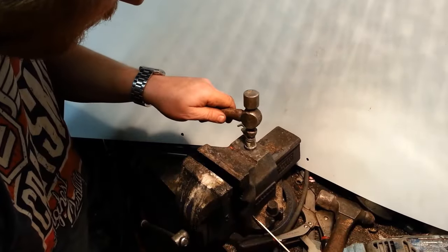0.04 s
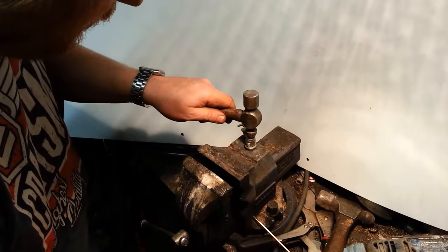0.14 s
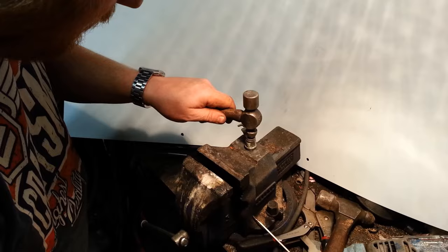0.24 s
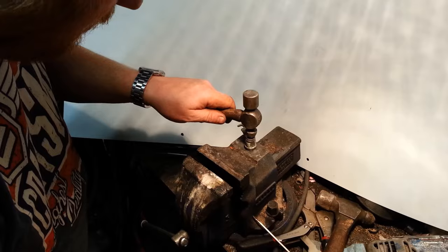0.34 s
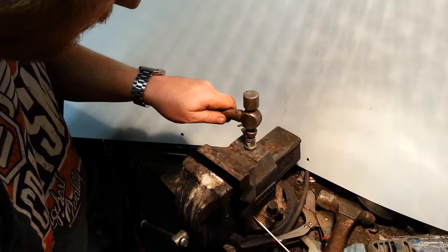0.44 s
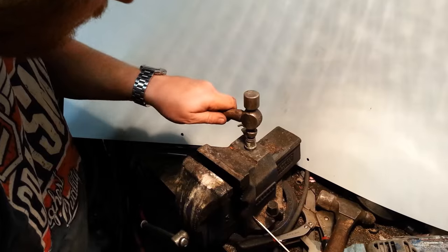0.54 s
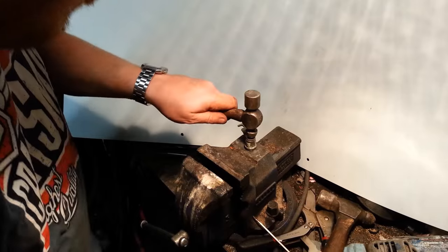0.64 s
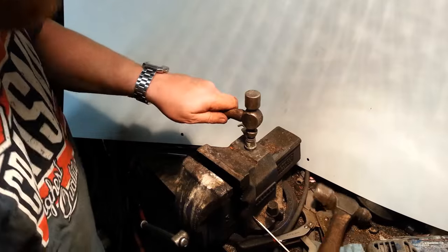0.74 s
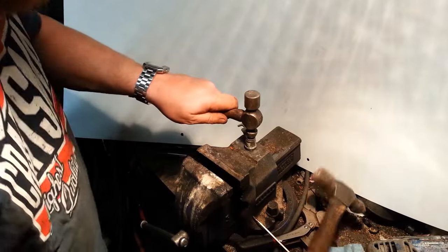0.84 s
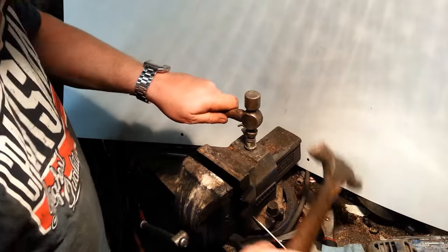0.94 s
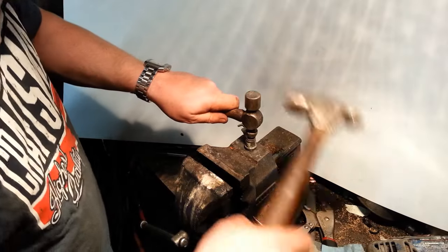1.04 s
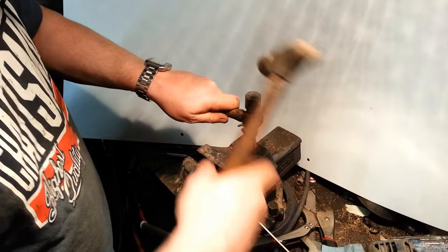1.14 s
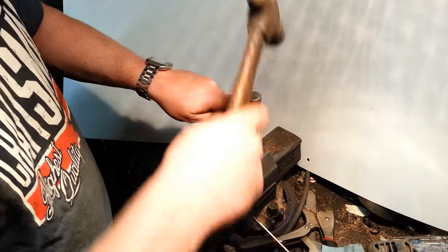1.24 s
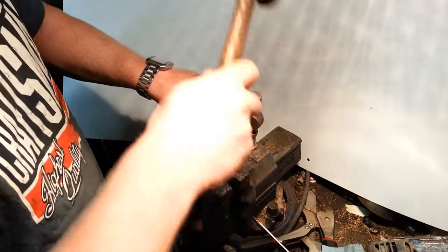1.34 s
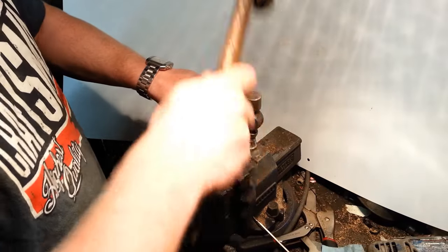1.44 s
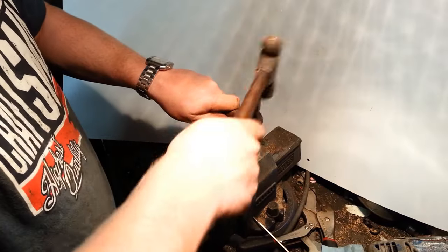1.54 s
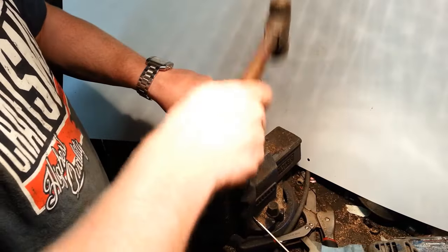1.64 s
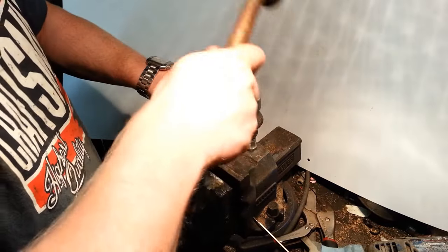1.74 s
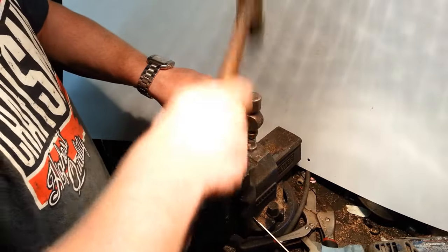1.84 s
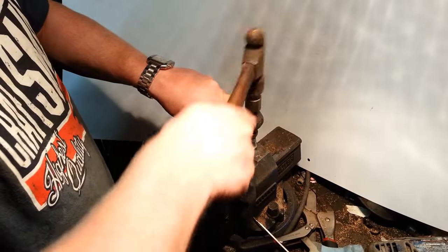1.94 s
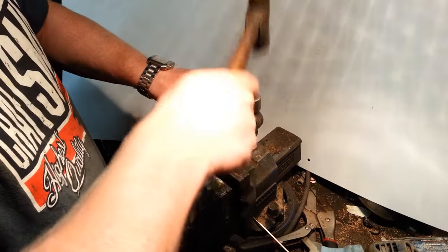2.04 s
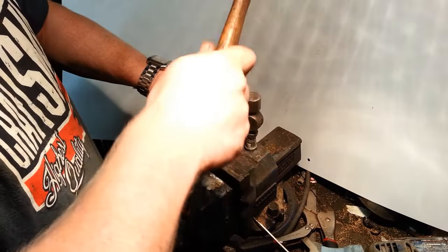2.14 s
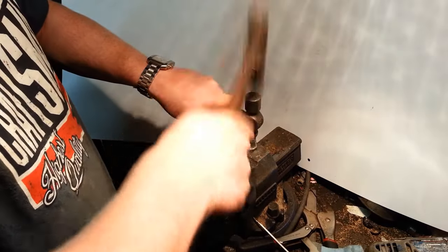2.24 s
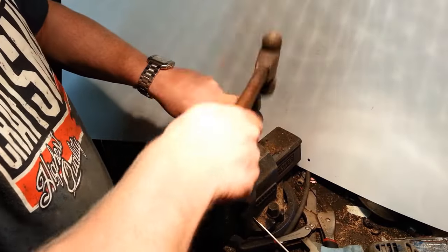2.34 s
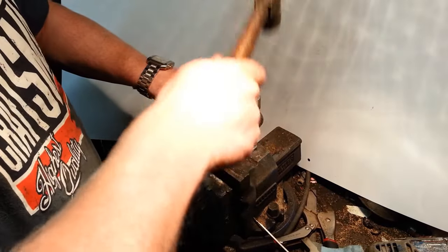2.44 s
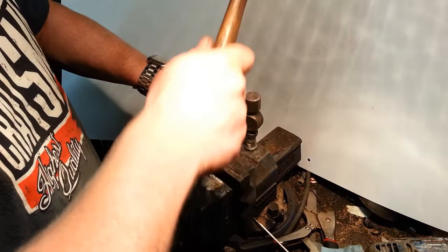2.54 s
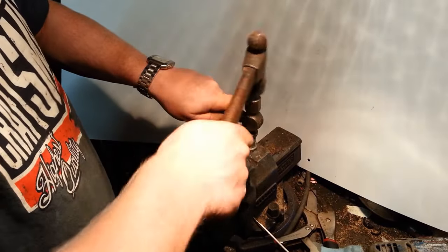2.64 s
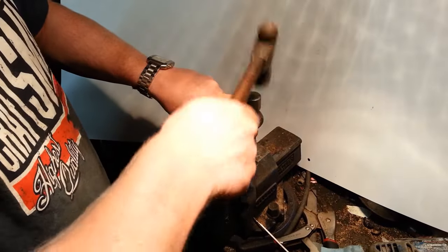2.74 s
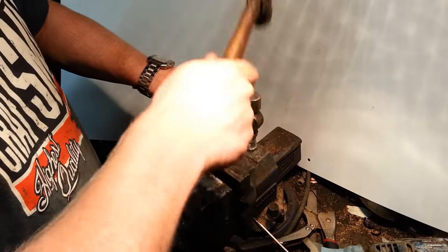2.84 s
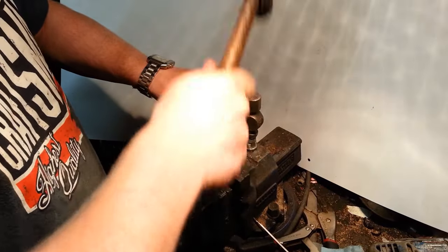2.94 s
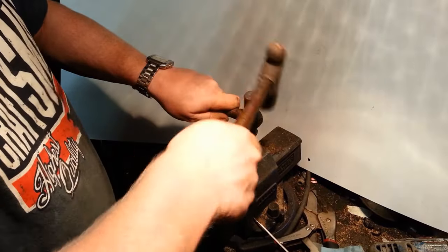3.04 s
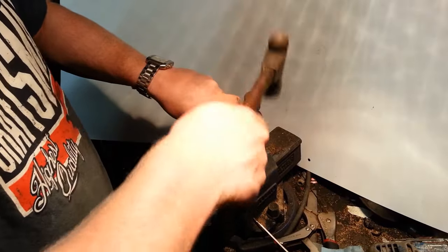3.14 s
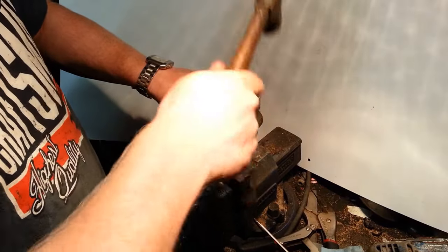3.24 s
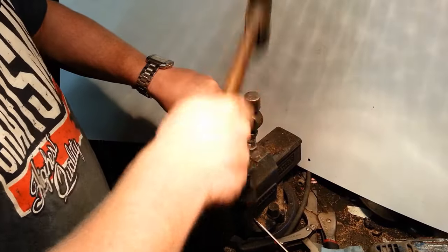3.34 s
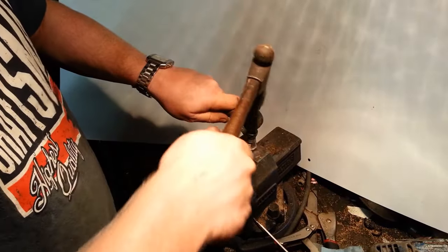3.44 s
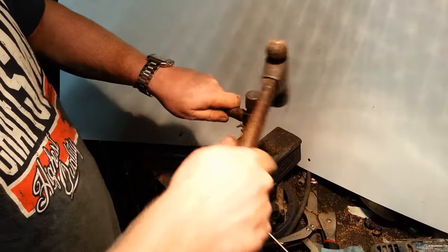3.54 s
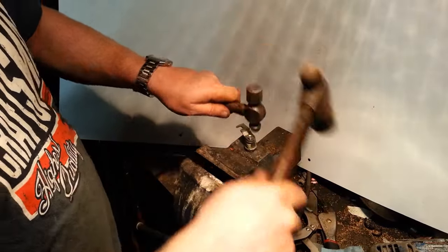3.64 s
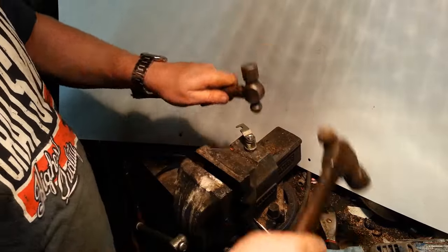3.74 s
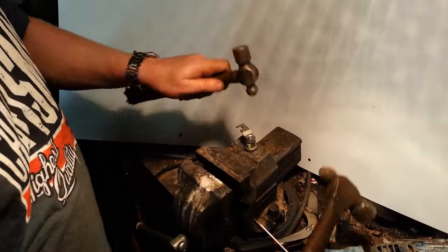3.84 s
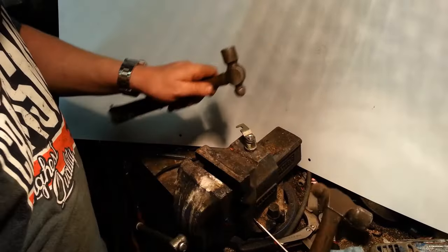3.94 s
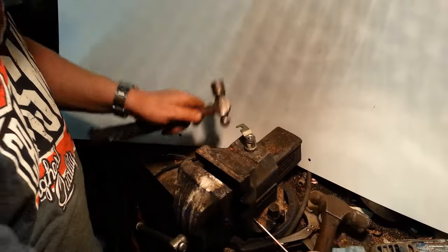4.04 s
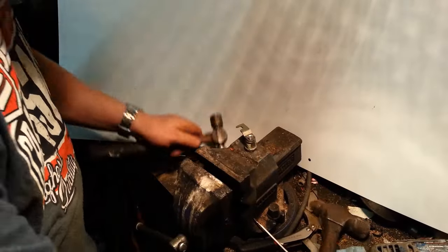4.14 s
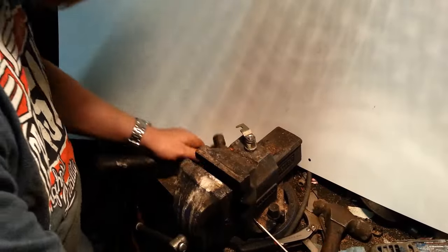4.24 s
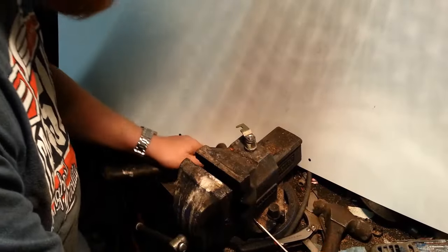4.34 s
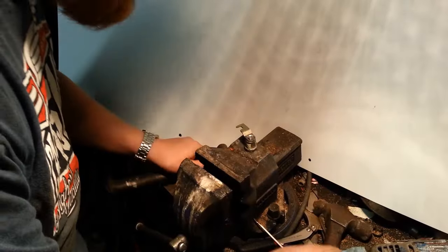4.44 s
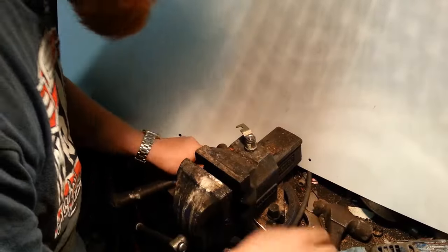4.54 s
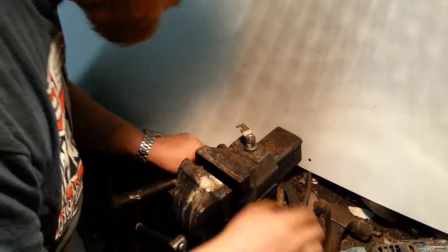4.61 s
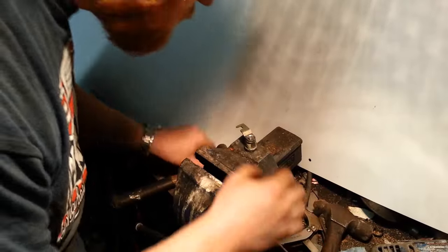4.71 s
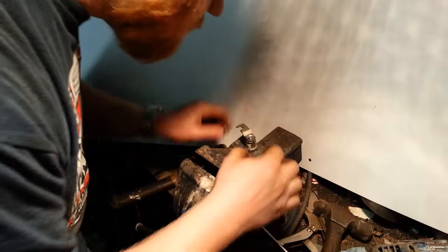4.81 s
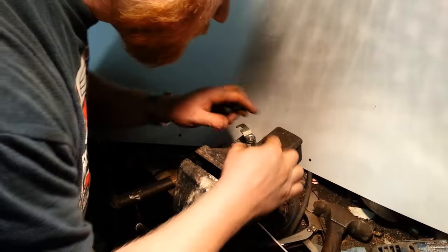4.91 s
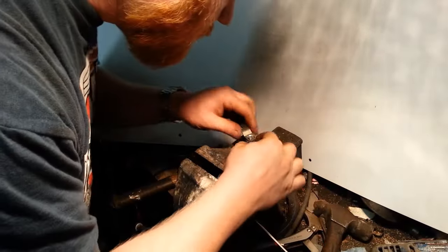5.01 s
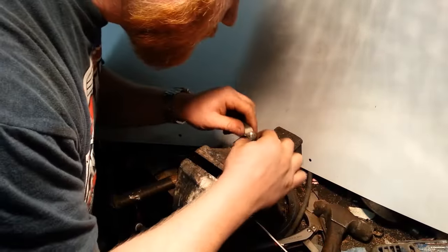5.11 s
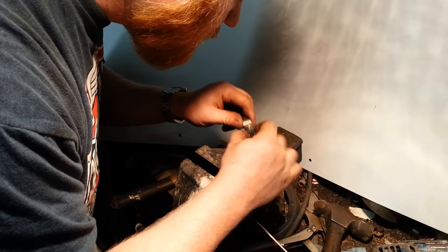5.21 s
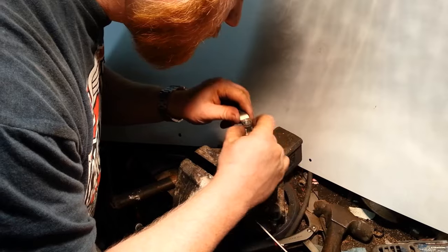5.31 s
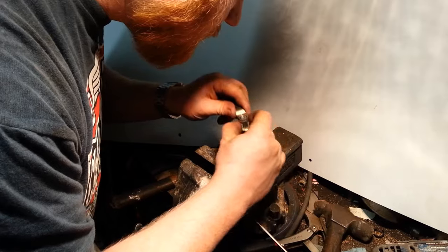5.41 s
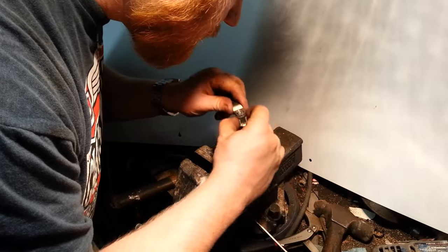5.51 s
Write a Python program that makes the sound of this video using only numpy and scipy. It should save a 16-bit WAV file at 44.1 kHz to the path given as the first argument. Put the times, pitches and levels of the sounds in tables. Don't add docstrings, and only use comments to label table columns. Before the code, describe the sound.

A small workshop heard from close by, over faint low hum and input hiss. At about 0.6-0.75 s, tiny ticks and soft wooden handle knocks; around 1.1-1.3 s, brief grainy rubs of cloth and skin, then a faint arm swing. Six steel-on-steel hammer blows follow at about 1.6, 2.0, 2.35, 2.7, 3.1 and 3.45 s: the first slightly lighter, the fourth most ringing, the fifth with the loudest crack. Each is a bright hard crack with short vise ring and heavy bench boom, clipping the microphone harshly; small rebounds, wooden knocks, jingling loose parts and a short dense room tail fill the gaps. Faint jingles and rustle at 3.7-4.0 s as the blows die away. At 4.25 s a hammer clanks onto the bench with a dull wooden thud, bounces, and another slaps flat at 4.4 s. Faint settling taps at 4.65 s, slight rustle, then quiet hum and hiss.

```python
import sys
import numpy as np
from scipy import signal
from scipy.fft import rfft, irfft
from scipy.io import wavfile
from scipy.ndimage import uniform_filter1d, minimum_filter1d

SR = 44100
rng = np.random.default_rng(int(sys.argv[2]) if len(sys.argv) > 2 else 0)


def voltage_ratio(decibels):
    exponent = np.asarray(decibels, float) / 20
    return 10 ** exponent


def generate_wav(sig):
    pcm = np.round(np.clip(np.atleast_2d(sig).T, -1, 1) * 32767).astype(np.int16)
    wavfile.write(sys.argv[1], SR, pcm)


N = 245681


def on_log(table, hz):
    table_hz, values = np.transpose(table)
    return np.interp(np.log(np.maximum(hz, 1)), np.log(table_hz), values)


def noise(colour, size):
    hz = np.arange(size // 2 + 1) * SR / size
    x = irfft(rfft(rng.standard_normal(size)) * voltage_ratio(on_log(colour, hz)), size)
    return x / np.std(x)


def burst(colour, fade, stretch, size=16384):
    t = np.arange(size) / SR
    spectrum = rfft(noise(colour, size))
    octave = np.log2(np.maximum(np.arange(size // 2 + 1) * SR / size, 1))
    out = np.zeros(size)
    for centre in np.arange(5, 14.5, 0.5):
        hz = 2 ** centre
        band = irfft(spectrum * np.clip(1 - 2 * abs(octave - centre), 0, 1), size)
        decay = voltage_ratio(-60 * t / (stretch * on_log(fade, hz)))
        out += band * decay * (1 - np.exp(-t * hz / 0.74))
    return out


def ring(modes, scatter_db, rough, size=16384):
    hz, db, t60 = np.transpose(modes)[:, :, None]
    t = np.arange(size) / SR
    level_luck, pitch_luck = rng.standard_normal((2, len(modes), 1))
    steps = np.repeat(rng.standard_normal((2, len(modes), size // 128)), 128, axis=2)
    phase_waver, level_waver = uniform_filter1d(steps, 256, axis=2)
    phase = 2 * np.pi * hz * (1 + 0.0028 * pitch_luck) * t + rough * np.sqrt(hz / 2000) * phase_waver
    level = voltage_ratio(db + scatter_db * level_luck - 60 * t / t60) * (1 + 0.5 * level_waver)
    return np.sum(level * np.sin(phase), axis=0)


def add(track, s, sound):
    i = int(s * SR)
    track[i:i + len(sound)] += sound[:N - i]


# frequency in Hz, level in dB per Hz.
BENCH_COLOUR = [(30, -44), (60, -21), (130, -10.5), (190, -21.5), (260, 8), (600, 6.5), (900, 5.5),
                (1500, -7.5), (3000, -33.5)]
# frequency in Hz, t60 in seconds.
STEEL_FADE = [(60, 0.39), (260, 0.13), (700, 0.097), (1840, .17), (4850, 0.16), (9000, 0.13), (12500, .12),
              (14000, 0.12)]


def steel(events, colour, modes, rough):
    out = np.zeros(N)
    for s, crack_db, bench_db, ring_db, stretch in events:
        add(out, s, voltage_ratio(crack_db) * burst(colour, STEEL_FADE, stretch))
        add(out, s, voltage_ratio(bench_db) * burst(BENCH_COLOUR, STEEL_FADE, stretch))
        add(out, s, voltage_ratio(ring_db) * ring(modes, scatter_db=1.5, rough=rough))
    return out


# start in seconds, crack in dB, ring of the vise in dB, song of the loose tools in dB,
# fade factor.
BLOWS = [
    (1.615, -2.5, -12, -53.5, 1.16),
    (1.969, 0, -5, -38.5, 1.15),
    (2.3426, 1, -3, -37.5, 1.1),
    (2.7162, 1.7, 1, -28, 1.246),
    (3.0921, 4, -4.5, -29.5, 1.055),
    (3.464, 3, -0.5, -29, 1.18),
]
# start in seconds, crack in dB, fade factor.
REBOUNDS = [
    (2.391, -12, 0.49),
    (2.785, -24.5, 1.6),
    (3.518, -16.5, .45),
]
# frequency in Hz, level in dB per Hz.
CRACK_COLOUR = [(530, -23.5), (900, 1.5), (1600, 4), (2100, 2.5), (2900, 2.5), (4100, 6), (5000, 5.5),
                (5800, -3.5), (7200, -5), (8500, 3.5), (9400, -6), (11900, -6.5), (13200, -12),
                (15400, -27.5)]
# frequency in Hz, level in dB, t60 in seconds.
VISE_MODES = [(272.8, -9, 0.21), (313, -15, .13), (324.6, -14, 0.074), (516.5, -17.5, 0.29),
              (575, -2, 0.11), (654, -8, 0.19), (846.4, -6.5, 0.16), (1152, -11.5, .2), (1412, -13.5, 0.17),
              (1850, -13.5, 0.11), (2200, -16, .1), (3670, -10, 0.15), (3800, -10.5, 0.14),
              (3997, -10.5, 0.25), (3730, -8, 0.12), (4920, -10.5, 0.062), (4600, -11, 0.18),
              (5210, -12, 0.085), (5860, -17.5, 0.13), (7900, -16.5, 0.12), (8400, -19, 0.13),
              (8500, -11, 0.18), (8750, -22, .11), (10900, -23, 0.15), (12000, -15, 0.11)]


def hammer_blows():
    strikes = []
    for s, db, ring_db, _, fade in BLOWS:
        strikes.append((s, db, db - 2.5, ring_db, fade))
    for s, db, fade in REBOUNDS:
        strikes.append((s, db, db + 3.2, db - 12.5, fade))
    return steel(strikes, CRACK_COLOUR, VISE_MODES, rough=0.85)


# start in seconds, clank in dB, bench in dB, long ring in dB, fade factor.
DROPS = [
    (4.1293, -44, -59.5, -61.5, .9),
    (4.2435, 0, -4.5, -7, 0.58),
    (4.3474, -26, -31, -54, 0.27),
]
# frequency in Hz, level in dB per Hz.
CLANK_COLOUR = [(530, -37.5), (900, -3), (1730, -9.5), (4080, -0.5), (4540, -5.5), (4930, -4),
                (6330, -15.5), (14400, -23.5), (15400, -47)]
# start in seconds, slap in dB, bench in dB, long ring in dB,
# fade factor.
SLAPS = [
    (4.4103, -6, -49, -33, 0.58),
    (4.660, -36.5, -62, -57, 1),
]
# frequency in Hz, level in dB per Hz.
SLAP_COLOUR = [(210, -42), (350, -11.5), (656, 8), (1350, -6.5), (2660, -5.5), (2970, -13.5), (3760, -5.5),
               (5200, -9.5), (5900, -25.5), (9360, -42), (10800, -49), (12200, -29), (15000, -93)]
# frequency in Hz, level in dB, t60 in seconds.
HEAD_MODES = [(3380, -4.5, 0.12), (3700, -15.5, 0.062), (4500, -9, .1), (5140, -14.5, .08),
              (5960, -18, 0.081), (8250, -13, .12), (9100, -14.5, 0.094), (10200, -22.5, 0.136),
              (11200, -21.5, .14), (11710, -26, 0.13), (14200, -19, .1)]


def dropped_hammers():
    clanks = steel(DROPS, CLANK_COLOUR, HEAD_MODES, rough=0.9)
    return clanks + steel(SLAPS, SLAP_COLOUR, HEAD_MODES, rough=0.97)


# frequency in Hz, level in dB, t60 in seconds.
TOOL_MODES = [(1200, 1.5, 0.54), (1235, -5, .4), (1296, -8, .5), (1355, -1.5, 0.8), (1362, -5, 0.65),
              (1630, -7, 0.45), (2255, -5, .5), (2330, -7, .45)]
# time of the blow in seconds, level in dB, pitch in Hz,
# t60 in seconds.
FAVOURED_MODES = [(1.615, -1, 2200, 0.043), (1.615, -5.5, 295, .08), (1.615, -4.5, 555, 0.083),
                  (1.615, -32.5, 1533, 0.43), (1.97, -6.5, 670, .08), (2.343, -4, 565, 0.089),
                  (2.717, -10.5, 1918, 0.19), (3.093, -6, 4940, 0.084), (3.093, -1.5, 630, .08)]
# frequency in Hz, level in dB, t60 in seconds.
FLAT_MODES = [(627, -7.5, 0.023), (950, -10.5, 0.019), (1206, -8, .03), (2500, -19, .03), (1440, -42, 0.33)]


def singing_bars():
    out = np.zeros(N)
    strikes = np.array(BLOWS)[:, 0]
    for s, _, _, song_db, _ in BLOWS:
        add(out, s, voltage_ratio(song_db) * ring(TOOL_MODES, scatter_db=3, rough=0.6, size=32768))
    for s, db, hz, t60 in FAVOURED_MODES:
        nearest_blow = strikes[np.argmin(abs(strikes - s))]
        add(out, nearest_blow, voltage_ratio(db) * ring([(hz, 0, t60)], scatter_db=1, rough=0.25, size=32768))
    add(out, SLAPS[0][0], ring(FLAT_MODES, scatter_db=1.5, rough=0.9))
    return signal.sosfilt(signal.butter(2, 200, "high", fs=SR, output="sos"), out)


# start in seconds, tone in dB, pitch in Hz, t60 in seconds,
# top of the thud in Hz.
KNOCKS = [(0.6567, -20, 375, 0.014, 1600), (0.7422, -24.5, 315, 0.034, 1700),
          (2.394, -6.5, 493, 0.026, 1000), (3.2808, -10.5, 516, 0.021, 1000), (3.517, -3, 563.6, .04, 2200),
          (4.246, -10, 225, 0.047, 500), (4.271, -3, 389, 0.032, 1100), (4.3477, -23.5, 382, 0.062, 1200),
          (4.6573, -22, 432, 0.056, 2000)]
# start in seconds, tone in dB, pitch in Hz, t60 in seconds.
SETTLES = [(.668, -29.5, 456, 0.04), (0.721, -36, 497, 0.06), (0.733, -37, 330, 0.053),
           (.757, -44, 427, .03), (3.284, -36, 1890, .03), (3.288, -24, 628, .03), (3.300, -24, 328, .04),
           (3.8263, -41.5, 905, 0.057), (4.679, -33.5, 224, 0.16), (4.69, -38, 300, .12)]


def handle_knocks():
    out, t = np.zeros(N), np.arange(8192) / SR
    touches = [(*row, -9.5) for row in KNOCKS]
    touches += [(*row, 800, -8) for row in SETTLES]
    for s, db, hz, t60, top_hz, thud_db in touches:
        tone = (1 - np.exp(-t / 0.00033)) * voltage_ratio(-60 * t / t60) * np.sin(2 * np.pi * hz * t)
        colour = [(80, -25), (220, 0), (top_hz, -4), (1.5 * top_hz, -20), (8 * top_hz, -50)]
        fade = [(100, 3.7 * t60), (1500, 2.3 * t60)]
        thud = burst(colour, fade, 0.97, size=8192) * (1 - np.exp(-t / 0.0011))
        add(out, s, voltage_ratio(db) * (tone + voltage_ratio(thud_db) * thud))
    return signal.sosfilt(signal.butter(2, 130, "high", fs=SR, output="sos"), out)


# start in seconds, level in dB, centre in Hz, width in Hz.
TICKS = [(0.5663, -33.5, 9500, 9000), (.5668, -39, 2750, 1500), (.6964, -39, 9000, 7000),
         (0.7408, -38, 2800, 2000), (1.056, -44, 8560, 3000), (1.4767, -33.5, 12900, 2990),
         (3.279, -45, 2500, 3000), (4.1298, -23, 3800, 3500), (4.1282, -35, 9500, 9000),
         (4.3475, -34, 4535, 4500), (1.6164, -1, 11700, 6000)]


def ticks():
    out, t = np.zeros(N), np.arange(441) / SR
    for s, db, hz, width_hz in TICKS:
        edges = np.clip([hz - width_hz / 2, hz + width_hz / 2], 200, 0.45 * SR)
        resonance = signal.butter(2, edges, "band", fs=SR, output="sos")
        click = signal.sosfilt(resonance, rng.standard_normal(len(t)) * np.exp(-t / 0.0031))
        add(out, s, voltage_ratio(db) * click / np.max(abs(click)))
    return out


# start in seconds, level in dB.
JINGLES = [(2.6712, -45), (2.9786, -41), (3.064, -40), (3.285, -40), (3.3595, -39), (3.4342, -42),
           (3.7354, -39.5), (3.8147, -37), (3.829, -39), (3.882, -46), (4.015, -50)]
# frequency in Hz, level in dB, t60 in seconds.
LOOSE_MODES = [(2310, 2, 0.091), (2922, -1, 0.031), (3500, -6, 0.05), (4220, -2.5, 0.066),
               (1130, -4.5, 0.055), (7000, -8, .03)]


def jingles():
    out = np.zeros(N)
    colour = [(900, -16), (2200, 1), (4500, -5), (9000, -21.5), (14000, -27.5)]
    for s, db in JINGLES:
        for lag_s, drop_db in ((0, -7), (0.007, -7), (0.016, -16)):
            scratch = voltage_ratio(1) * burst(colour, STEEL_FADE, 0.55, size=4096)
            chime = voltage_ratio(-2.5) * ring(LOOSE_MODES, scatter_db=3, rough=0.8, size=4096)
            add(out, s + lag_s, voltage_ratio(db + drop_db) * (scratch + chime))
    return out


# start in seconds, length in seconds, level in dB.
RUBS = [
    (1.095, .095, -51),
    (1.18, 0.063, -52.5),
    (1.225, .07, -48),
]
# start in seconds, length in seconds, level in dB.
SWINGS = [
    (1.33, 0.29, -59.5),
    (3.68, 0.54, -59.5),
    (4.72, 0.252, -61),
]


def rustle():
    out = np.zeros(N)
    for strokes, top_db in ((RUBS, -3), (SWINGS, -16)):
        colour = [(1800, -29), (2800, 4.5), (4500, -1), (6000, top_db), (13500, top_db), (15000, -24.5)]
        flicker_db = 1.8 * np.repeat(rng.standard_normal(N // 100 + 1), 100)[:N]
        grain = noise(colour, N) * voltage_ratio(flicker_db)
        swell = np.zeros(N)
        for s, length_s, db in strokes:
            add(swell, s, voltage_ratio(db) * np.hanning(int(length_s * SR)) ** 0.47)
        out += grain / np.std(grain) * swell
    return out


# frequency in Hz, t60 in seconds.
ROOM_T60 = [(100, 0.48), (500, 0.51), (2000, 0.41), (6000, 0.35), (14000, 0.031)]


def walls(near):
    colour = [(30, -11.5), (150, 1), (700, -6), (5000, -4), (15000, 14)]
    tail = burst(colour, ROOM_T60, 0.94, size=32768)
    tail = np.r_[np.zeros(int(0.004 * SR)), tail / np.sqrt(np.sum(tail ** 2))]
    return voltage_ratio(-12) * signal.fftconvolve(near, tail)[:N]


# frequency in Hz, level in dB per Hz.
SHOP_COLOUR = [(15, -60), (25, -45.5), (43, -30.5), (65, -6), (149, -4.5), (179, -4), (420, -8), (455, -9),
               (627, -11), (796, -11.5), (1040, -14), (1320, -15.5), (2080, -16.5), (5560, -25.5),
               (14500, -25)]


def shop():
    level_db, stir_db, rise_s, fade_s = -51.5, 6, 0.078, 0.23
    t, stir = np.arange(N) / SR, np.zeros(N)
    rings = [(s, ring_db) for s, _, ring_db, _, _ in BLOWS]
    rings += [(s, ring_db) for s, _, _, ring_db, _ in DROPS]
    for s, ring_db in rings:
        since = np.maximum(t - s, 0)
        stir += voltage_ratio(ring_db) * (1 - np.exp(-since / rise_s)) * np.exp(-since / fade_s)
    return noise(SHOP_COLOUR, N) * voltage_ratio(level_db + stir_db * stir)


def scene():
    near = hammer_blows() + dropped_hammers() + singing_bars()
    near += handle_knocks() + ticks() + jingles() + rustle()
    return np.tile(near + walls(near) + shop(), (2, 1))


def overload(x):
    hot = np.clip(x, -0.97, 0.97)
    offset = hot - x * (abs(x) < 0.02)
    return hot - signal.sosfilt(signal.butter(1, 30, fs=SR, output="sos"), offset)


def thin_treble(x):
    under_db, knee_hz, db_per_khz = -17.5, 12000, 3
    hz, _, frames = signal.stft(x, SR, nperseg=1024)
    power = abs(frames) ** 2
    bar_db = under_db - db_per_khz * np.maximum(knee_hz - hz, 0)[:, None] / 1000
    bar = power[hz > 1500].mean(axis=0) * voltage_ratio(2 * bar_db)
    bands = uniform_filter1d(power, 7, axis=0)
    return signal.istft(frames * (bands > bar), SR, nperseg=1024)[1][:N]


# start in seconds, difference in dB.
APART = [
    (1.643, -37.5),
    (1.962, -26.5),
    (2.336, -20.5),
    (2.712, -20.5),
    (3.485, -27.5),
    (4.396, -44.5),
]
# frequency in Hz, level in dB per Hz.
GRIT_COLOUR = [(24, -39), (40, -17.5), (472, -2.5), (636, -6.5), (4790, -7), (13000, -13.5), (15400, -28.5)]


def side_grit():
    swell = np.zeros(N)
    for s, db in APART:
        add(swell, s, voltage_ratio(db) * np.hanning(int(0.065 * SR)) ** 0.5)
    return swell * noise(GRIT_COLOUR, N) * np.array([[1], [-1]])


def band_limit(x):
    return signal.sosfilt(signal.butter(12, 14700, fs=SR, output="sos"), x)


def record(dry):
    hot = overload(dry[0])
    ahead = -minimum_filter1d(-abs(hot), 141, origin=-70)
    coming = -minimum_filter1d(-abs(hot), 401, origin=-200) > 0.9
    hush = 1 - 0.47 * uniform_filter1d(coming * (ahead < 0.05) * 1.0, 64)
    smear = voltage_ratio(-35.5) * ahead * rng.standard_normal(N) * (ahead > 0.5)
    mix = thin_treble(hot * hush) + smear + side_grit()
    return band_limit(mix)


dry = scene()
out = record(dry)
generate_wav(out)
```